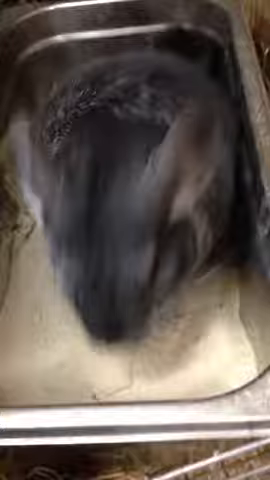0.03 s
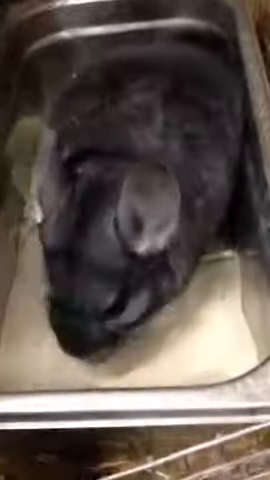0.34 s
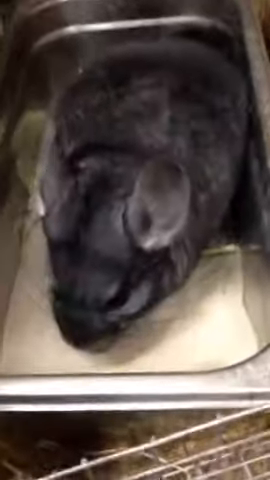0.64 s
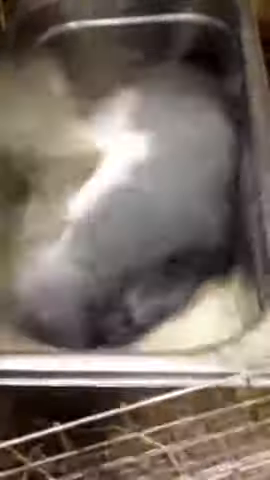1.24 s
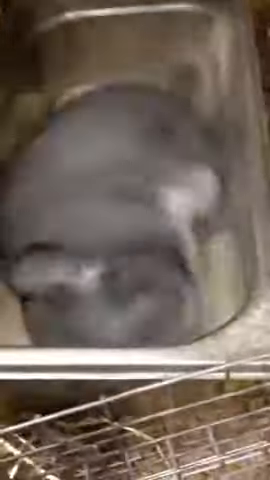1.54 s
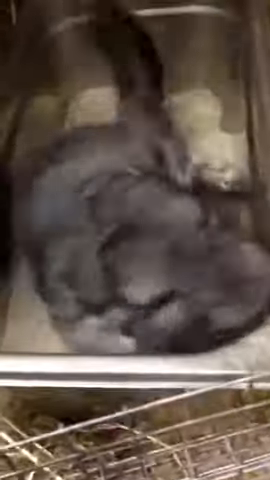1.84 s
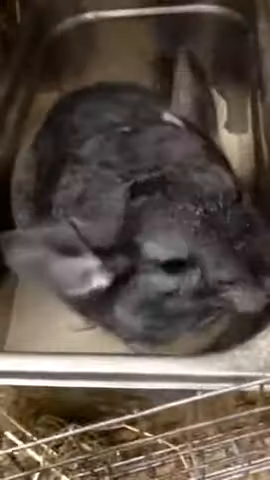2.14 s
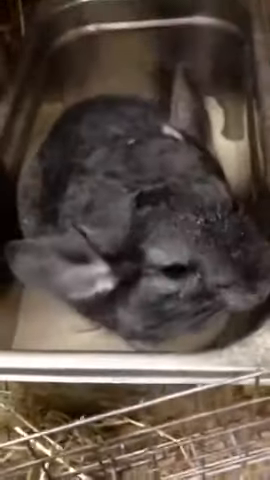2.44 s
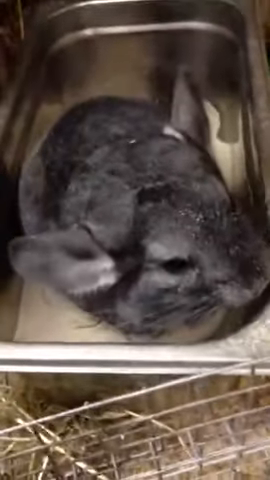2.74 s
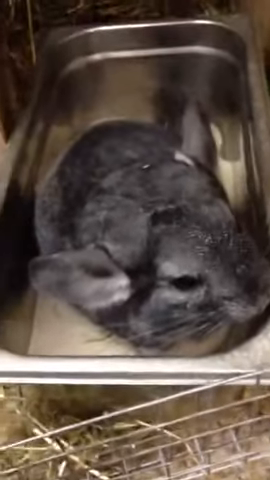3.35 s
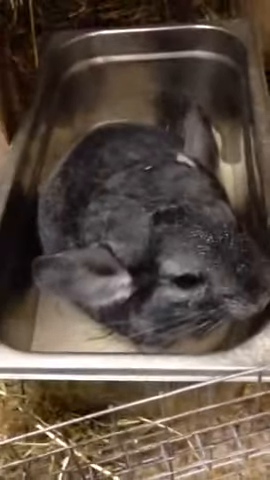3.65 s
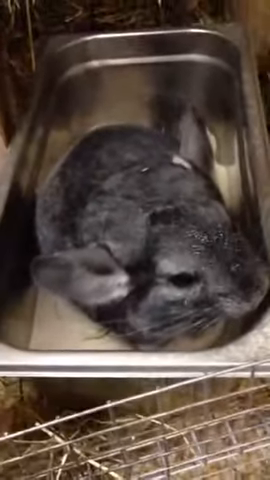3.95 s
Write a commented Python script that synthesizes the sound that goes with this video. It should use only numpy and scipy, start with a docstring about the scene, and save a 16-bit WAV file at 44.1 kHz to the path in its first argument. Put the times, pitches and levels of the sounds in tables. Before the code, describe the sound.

A small furry animal rolls in a metal pan of dust, swishing and thumping softly.

```python
"""A chinchilla shuffles in a steel pan of fine dust, then rolls over once and sits still.
Its fur sweeps the dust into a grainy hiss, its body thumps the pan, and a foot kicks grit
against the wall, which rings briefly. A few faint scratches follow.
Behind it, a mains-driven machine hums in the room over a steady rush of air."""
import sys
import numpy as np
from scipy import signal
from scipy.fft import rfft, irfft
from scipy.io import wavfile

SR = 44100
rng = np.random.default_rng(int(sys.argv[2]) if len(sys.argv) > 2 else 0)


def transcribe(u):
    """Save the signal u as a 16-bit wav file named by the first command-line argument.

    u: samples, shape (n,) or (channels, n), limited to [-1, 1]; the rate is SR.
    q: integer samples, one column per channel.
    """
    v = np.clip(np.atleast_2d(u).T, -1, 1)
    q = np.round(v * 32767).astype(np.int16)
    wavfile.write(sys.argv[1], SR, q)


N = 176400
TIME = np.arange(N) / SR
BIN_LOG_HZ = np.log(np.maximum(np.arange(N // 2 + 1) * SR / N, 1))


def from_db(db):
    """Decibels to gain."""
    return 10 ** (np.asarray(db) / 20)


def unit_rms(x):
    """Scale to rms 1."""
    return x / np.sqrt(np.mean(x ** 2) + 1e-20)


def drift(rate_hz):
    """Smooth random modulation with a spread of 1."""
    hop, warm_up = 40, 2000
    pole = np.exp(-2 * np.pi * rate_hz * hop / SR)
    noise = rng.standard_normal(N // hop + warm_up + 2)
    slow = signal.lfilter([1], [1, -2 * pole, pole * pole], noise)[warm_up:]
    return np.interp(np.arange(N) / hop, np.arange(len(slow)), unit_rms(slow))


def colour(x, spectrum):
    """Shape a sound with an EQ curve; rms 1."""
    hz, db = np.transpose(spectrum)
    return unit_rms(irfft(rfft(x) * from_db(np.interp(BIN_LOG_HZ, np.log(hz), db)), N))


def band(x, hz, width_hz):
    """Pass a sound through one broad resonance; rms 1."""
    r = np.exp(-np.pi * width_hz / SR)
    return unit_rms(signal.lfilter([1, 0, -1], [1, -2 * r * np.cos(2 * np.pi * hz / SR), r * r], x))


def ring(force, hz, t60_s):
    """One mode: a unit click rings with height 1."""
    r, w = from_db(-60 / (t60_s * SR)), 2 * np.pi * hz / SR
    return signal.lfilter([0, np.sin(w)], [1, -2 * r * np.cos(w), r * r], force + 1e-18)


def burst(start_s, decay_s):
    """Envelope with an instant attack and an exponential tail."""
    return (TIME >= start_s) * np.exp(-np.maximum(TIME - start_s, 0) / decay_s)


def grains(per_s=7000, spread_db=2.5):
    """A dense stream of tiny impacts of uneven size."""
    sizes = from_db(spread_db * np.minimum(rng.exponential(1, N), 5)) * rng.choice([-1, 1], N)
    return sizes * (rng.random(N) < per_s / SR)


# Room tone EQ: frequency_hz, gain_db
AIR_EQ = [(25, -19), (42, -10), (62, -1), (85, 5.5), (125, -0.5), (160, -4.5), (200, 3), (245, -9.5),
          (300, -4), (390, -9), (460, -18.5), (560, -12), (700, -14.5), (860, -22), (1150, -24),
          (1900, -29), (2800, -33), (3600, -37.5), (6000, -45), (10500, -52)]

def room_air(rush_db=-42, whir_db=-71.5, whir_hz=2446, width_hz=300, flutter_db=3.5):
    """A steady bed of rushing air with a faint, fluttering whir."""
    whir_gain = from_db(whir_db + flutter_db * drift(28))
    whir = band(band(rng.standard_normal(N), whir_hz, width_hz), whir_hz, width_hz)
    return whir_gain * whir + from_db(rush_db) * colour(rng.standard_normal(N), AIR_EQ)


# Partials of the machine's hum: harmonic_number, level_db, waver_db
HUM_PARTIALS = [(1, -32.5, 0.5), (2, -37, 1.04), (3, -57.5, 1.5), (5, -68.5, 5.5), (6, -69, 4)]

def mains_hum(pitch_hz=99.76, wobble_rad=0.13):
    """Harmonics of twice the mains rate, each wavering in level and phase."""
    hum = np.zeros(N)
    for harmonic, db, waver_db in HUM_PARTIALS:
        peak = np.sqrt(2) * from_db(db + waver_db * drift(7.2))
        phase = 2 * np.pi * pitch_hz * TIME + wobble_rad * drift(2.1)
        hum += peak * np.cos(harmonic * phase + rng.uniform(0, 1))
    return hum


# Small scratches of claws and grit: start_s, level_db
SCRATCHES = [(2.2355, -63.5), (2.386, -67), (3.4803, -63), (3.5331, -64.5), (3.715, -67.5)]

def claw_scratches(decay_s=0.0069):
    """Faint, bright ticks while the animal sits."""
    envelope = sum(from_db(db) * burst(start_s, decay_s) for start_s, db in SCRATCHES)
    return envelope * band(grains(), hz=8450, width_hz=3000)


# Low end of a puff of air: frequency_hz, gain_db
RUMBLE_EQ = [(20, -18), (45, -3), (68, 5), (120, -9), (300, -35)]

def air_puff(peak_s=1.41, width_s=0.06, peak_db=-43):
    """A soft, low puff of air swells and fades as the animal flips over."""
    swell = from_db(peak_db) * np.exp(-((TIME - peak_s) / width_s) ** 2)
    return swell * colour(rng.standard_normal(N), RUMBLE_EQ)


# Bright tone of sliding dust: frequency_hz, gain_db
DUST_EQ = [(1000, -3), (2400, 1.5), (4000, -0.5), (5000, 0.5), (6500, 1), (8400, 0.5), (10500, -4)]

def dust_hiss():
    """Tiny impacts of dust blur into a hiss."""
    return colour(grains(), DUST_EQ)


def clumps(hiss, flicker_db=2.0, count=9):
    """Dust slides in clumps: each half-octave of the hiss flickers on its own."""
    spectrum = rfft(hiss)
    centres = np.log(np.geomspace(700, 11000, count))
    bands = [irfft(spectrum * np.interp(BIN_LOG_HZ, centres, pick), N) for pick in np.eye(count)]
    return unit_rms(sum(part * from_db(flicker_db * drift(25)) for part in bands))


# Duller tone of the pan's bottom: frequency_hz, gain_db
RUB_EQ = [(250, -29), (420, 15.5), (530, 0.5), (730, 15.5), (880, 7.5), (1600, 0.5), (2600, -6), (4000, -8),
          (8000, -28.5)]

def pan_rub():
    """Grains rub on the bottom of the pan."""
    return colour(grains(), RUB_EQ)


def with_wall_shimmer(dry, low_hz=1291, high_hz=10580, t60_s=0.072, mix_db=-7, count=70):
    """Add the faint, close-set modes of the thin steel walls to a sound."""
    pitches = np.geomspace(low_hz, high_hz, count) * rng.uniform(0.98, 1.02, count)
    gains = rng.standard_normal(count)
    shimmer = sum(gain * ring(dry, hz, t60_s) for hz, gain in zip(pitches, gains))
    return dry + from_db(mix_db) * np.std(dry) * unit_rms(shimmer)


# Modes of the pan, damped by the dust: pitch_hz, gain_db, t60_s
PAN_MODES = [(363.3, 1.5, .17), (437, -4, 0.24), (650, 3, 0.082), (745, -1, 0.15), (1134, -2.5, 0.078),
             (1597, -3.5, 0.088), (1937, -2.5, 0.082), (2343, -2, 0.037), (4550, -14, 0.24),
             (4940, -5, 0.14), (6200, -10, .22), (7340, -4.5, 0.22), (8300, -10, 0.11), (9200, -3.5, .22)]

def pan_ring(scrape, mix_db=-9.5):
    """The steel rings under a scrape, at a level relative to it."""
    steel = sum(from_db(db) * ring(scrape, hz, t60_s) for hz, db, t60_s in PAN_MODES)
    return from_db(mix_db) * np.std(scrape) * unit_rms(steel)


# Hits on the pan: start_s, strength_db, contact_tone_hz, crack_offset_db, thud_offset_db
HITS = [(1.306, -31, 670, -25, -2), (1.3205, -40.5, 450, -18, 5.5), (1.3234, -40.5, 1630, -22, -19),
        (1.4145, -42, 5900, 9, -26), (1.422, -32, 1990, -14, -30), (1.44, -44, 400, -15, -5),
        (1.505, -43, 450, -12, -2), (1.945, -48.5, 450, -20, -3)]

def pan_hits(scatter_s=0.0018, contact_q=1.24, crack_s=0.0072, thud_s=0.011, thud_hz=(350, 820)):
    """The soft body thuds in the pan's low modes; claws ring the high ones with a crack of grit."""
    steel = np.zeros(N)
    for hz, mode_db, t60_s in PAN_MODES:
        force = np.zeros(N)
        for start_s, db, contact_hz, _, _ in HITS:
            # A contact favours the modes near its own tone.
            share = 1 / (1 + 2 * (contact_q * np.log(hz / contact_hz)) ** 2) ** 1.53
            onset = int((start_s + scatter_s * rng.random()) * SR)
            force[onset] += share * from_db(db + mode_db + rng.normal(0, 1))
        steel += ring(force, hz, t60_s)
    crack_envelope, thud_envelope = np.zeros((2, N))
    for start_s, db, _, crack_db, thud_db in HITS:
        crack_envelope += from_db(db + crack_db) * burst(start_s, crack_s)
        thud_envelope += from_db(db + thud_db) * burst(start_s, thud_s)
    thud_band = signal.butter(2, thud_hz, "band", fs=SR, output="sos")
    thud = signal.sosfilt(thud_band, thud_envelope * pan_rub())
    return steel + thud + with_wall_shimmer(crack_envelope * dust_hiss())


# Level curve of fur rolling through the dust: time_s, level_db
ROLL_ENVELOPE = [(0.08, -66), (.45, -68.5), (.65, -75), (1.0, -75), (1.05, -58.5), (1.2, -56), (1.4, -57),
                 (1.55, -58.5), (1.68, -60), (1.83, -65), (2.0, -64.5), (2.13, -73), (2.6, -85), (3.3, -96),
                 (3.5, -74), (3.7, -85)]
# Strokes of fur and paws: start_s, hold_s, level_db, pressure_offset_db, rasp_hz
STROKES = [(0.25, 0.058, -56.5, -5.5, 6200), (0.313, .065, -63, 7, 6600), (1.112, 0.044, -49, 4, 3070),
           (1.273, 0.05, -54.5, -3, 2300), (1.415, 0.011, -43, 0, 4830), (1.438, 0.054, -47, -5, 5500),
           (1.505, 0.015, -48.5, -6.5, 3500), (1.614, 0.041, -58, -15, 7460), (1.697, 0.041, -54, -9, 7270),
           (1.774, .02, -57.5, 6, 1700), (1.875, 0.02, -55, -16, 9750), (1.937, 0.03, -56, 1.5, 6100),
           (2.032, 0.026, -65.5, -8, 8000), (3.397, .09, -75.5, 17.5, 1900)]

def fur_sweeps(attack_s=0.005, release_s=0.012, roll_pressure_db=2.5, rasp_db=-6, uneven_db=1.07):
    """Fur drags the dust: grains hiss and rasp, pressure rubs the pan, and the steel rings along."""
    slide = from_db(np.interp(TIME, *np.transpose(ROLL_ENVELOPE)))
    pressure = slide * from_db(roll_pressure_db)
    rasp, grit = np.zeros(N), grains()
    for start_s, hold_s, db, pressure_db, rasp_hz in STROKES:
        fade_in = np.exp(-np.maximum(start_s - TIME, 0) / attack_s)
        fade_out = np.exp(-np.maximum(TIME - start_s - hold_s, 0) / release_s)
        stroke = from_db(db) * fade_in * fade_out
        slide = np.hypot(slide, stroke)  # roll and strokes add in power
        pressure = np.hypot(pressure, stroke * from_db(pressure_db))
        rasp += stroke * from_db(rasp_db) * band(grit, rasp_hz, width_hz=790)
    grip = from_db(uneven_db * drift(45))
    scrape = grip * (slide * clumps(dust_hiss()) + rasp + pressure * pan_rub())
    return with_wall_shimmer(scrape) + pan_ring(scrape)


def scene():
    """The dust bath, close up and in mono, over the room tone."""
    room = mains_hum() + room_air()
    return (room + fur_sweeps() + pan_hits() + air_puff() + claw_scratches())[None]


def record(dry, start_s=0.083, fade_s=0.002, cutoff_hz=10650):
    """The sound fades in fast after a moment of silence; a steep low-pass trims the top."""
    fade_in = np.clip((TIME - start_s) / fade_s, 0, 1)
    low_pass = signal.ellip(12, 0.2, 80, cutoff_hz, fs=SR, output="sos")
    return signal.sosfilt(low_pass, dry * fade_in)


dry = scene()
out = record(dry)
transcribe(out)
```